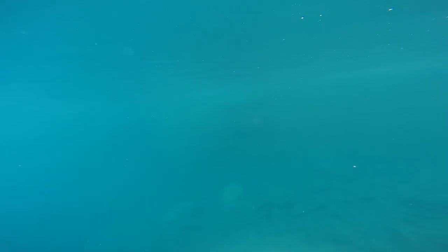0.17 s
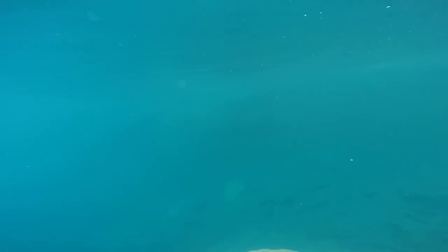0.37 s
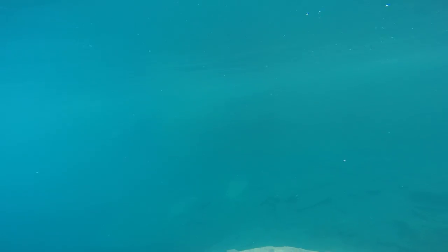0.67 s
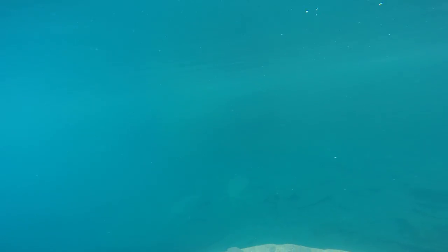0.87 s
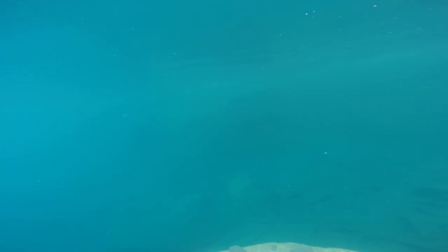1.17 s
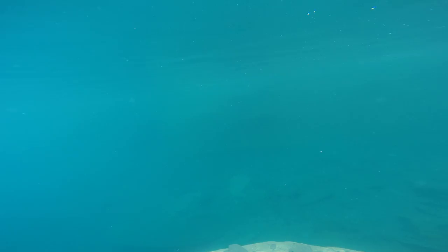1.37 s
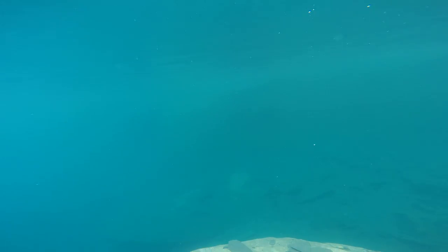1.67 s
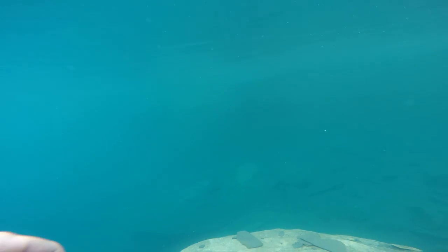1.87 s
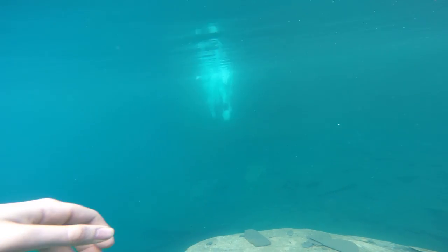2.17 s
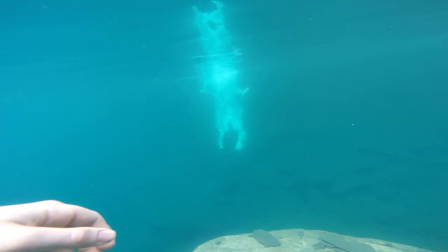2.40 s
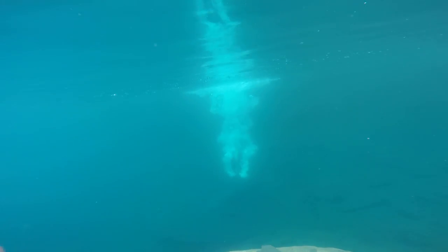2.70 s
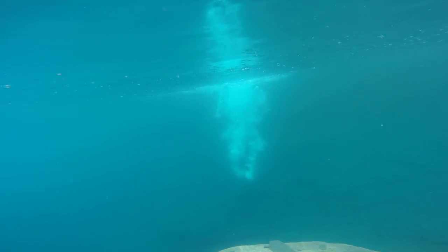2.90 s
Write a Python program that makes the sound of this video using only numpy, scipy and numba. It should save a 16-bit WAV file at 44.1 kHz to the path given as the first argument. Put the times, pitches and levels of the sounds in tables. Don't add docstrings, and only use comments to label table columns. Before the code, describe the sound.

A diver plunges in some metres off, heard underwater: soft low knocks and dark sloshing come first, then a bright slap, a tiny hush and fizzing bubbles, through a microphone sealed in a hard resonant housing.

```python
import sys
import numpy as np
from scipy import signal
from scipy.fft import rfft, irfft
from scipy.io import wavfile
from scipy.ndimage import uniform_filter1d
from numba import njit

SR = 44100
rng = np.random.default_rng(int(sys.argv[2]) if len(sys.argv) > 2 else 0)


def master_out(mix):
    frames = np.transpose(np.atleast_2d(mix))
    ceiling = np.clip(frames, -1, 1)
    pcm = np.round(ceiling * 32767).astype(np.int16)
    wavfile.write(sys.argv[1], SR, pcm)


def how_loud(loudness_db):
    steps = np.asarray(loudness_db, float) / 20
    return 10 ** steps


N = 134505


def level(x, db):
    return x * how_loud(db) / np.sqrt(np.mean(x ** 2))


def band(x, hz, width_hz):
    return signal.lfilter(*signal.iirpeak(hz, hz / width_hz, fs=SR), x)


def coloured(colour):
    hz = np.maximum(np.fft.rfftfreq(N, 1 / SR), 1)
    points_hz, points_db = np.array(colour).T
    gain = how_loud(np.interp(np.log(hz), np.log(points_hz), points_db)) * (hz > 12)
    return level(irfft(rfft(rng.standard_normal(N)) * gain, N), 0)


def walk(rate_hz):
    hold = int(SR / rate_hz)
    steps = np.repeat(rng.standard_normal(N // hold + 1), hold)
    return 1.64 * uniform_filter1d(uniform_filter1d(steps, hold), hold)[:N]


def ring(since_s, hz, t60_s):
    since_s = np.maximum(since_s, 0)
    return np.exp(-np.log(1000) * since_s / t60_s) * np.sin(2 * np.pi * hz * since_s)


@njit
def grains(at, hz, cycles, glide, size, count):
    out = np.zeros(count)
    for k in range(len(at)):
        length = int(2.5 * cycles * SR / hz[k])
        for i in range(min(length, count - at[k])):
            c = i * hz[k] / SR
            phase = 2 * np.pi * c * (1 + glide * c / cycles / 2)
            out[at[k] + i] += size[k] * np.exp(-2 * c / cycles) * np.sin(phase)
    return out


def scatter(count):
    when, pitch, size = rng.random((count, 3)).T
    return (when * N).astype(np.int64), pitch, size


# pitch_hz [Hz], level_db [dB per Hz]
HISS_COLOUR = [(300, -12), (550, -3), (1000, -5), (3000, -12), (6000, -18.5), (9000, -24.5), (12500, -28),
               (15300, -35)]
# pitch_hz [Hz], level_db [dB]
CIRCUIT_WHINES = [(5846, -82), (5873, -91), (11687, -97), (11719, -88), (14626, -84), (14653, -97)]


def electronics(t):
    hiss = level(coloured([(150, -33)] + list(HISS_COLOUR)), -62.5)
    for hz, db in CIRCUIT_WHINES:
        hiss += how_loud(db) * np.sqrt(2) * np.sin(2 * np.pi * hz * t)
    return hiss


# start_s [s], level_db [dB]
SLOSH_LEVEL = [(0, -47), (.3, -47), (.75, -53.5), (1.1, -56.5), (1.3, -55), (1.5, -52), (1.95, -52.5),
               (2.1, -52.5), (2.35, -49.5), (2.55, -53), (2.75, -47.5), (3.05, -42)]
# pitch_hz [Hz], level_db [dB per Hz]
WASH_COLOUR = [(20, 2), (55, -2), (100, -6), (160, -12), (280, -17), (420, -19), (700, -31.5), (1200, -54)]


def slosh(t):
    db = np.interp(t, *np.array(SLOSH_LEVEL).T) + 2.42 * walk(8.42)
    return coloured(WASH_COLOUR) * how_loud(db)


def surge():
    hz, width_hz = 33.4, 25
    return level(band(band(rng.standard_normal(N), hz, width_hz), hz, width_hz), -57)


def gurgle(t):
    start_s, rise_s, lowest_hz = 2.77, 0.04, 110
    at, pitch, size = scatter(5000)
    size = how_loud(-3 * np.log(1 - size) - 6 * pitch)
    bubbles = grains(at, lowest_hz * 5.5 ** pitch, 2.5, 0.2, size, N)
    fade_in = 1 / (1 + np.exp(-(t - start_s) / rise_s))
    return fade_in * level(band(bubbles, 300, 800), -50.5)


# start_s [s], level_db [dB], length_ms [ms]
CRACKLES = [(.623, -70, 6.5), (.630, -72, 3.), (.637, -70, 2.), (.652, -72, 4.), (.672, -68, 3.6),
            (.693, -66, 3.), (.730, -74, 4.), (1.105, -71, 3.), (1.239, -73, 3.), (1.522, -69, 3.),
            (1.674, -70, 3.), (1.907, -72, 6.8)]


def ticks(t):
    hz, width_hz = 10130, 900
    env = sum(how_loud(db) * np.exp(-((t - s) * 2000 / ms) ** 2) for s, db, ms in CRACKLES)
    noise = band(band(rng.standard_normal(N), hz, width_hz), hz, width_hz)
    return env * level(noise, 0)


# trough_s [s], level_db [dB], pitch_hz [Hz], rise_s [s], fall_s [s]
KNOCK_SWELLS = [(-.002, -37.5, 75.6, .004, 0.026), (0.14, -29.5, 64.6, 0.011, 0.027),
                (.421, -57, 40.4, .02, 0.022), (.568, -37, 61.6, 0.032, 0.041),
                (.540, -37.5, 83, 0.023, 0.013), (.686, -42.5, 45.4, 0.018, 0.034),
                (0.806, -31, 63.5, .018, 0.032), (1.039, -48, 70, 0.011, 0.014),
                (1.179, -37, 71, 0.029, 0.013), (1.221, -39.5, 42, 0.014, 0.021),
                (1.441, -31, 54.5, 0.011, 0.031), (1.661, -42.5, 45.3, 0.0067, 0.014),
                (1.794, -29.5, 67, 0.018, 0.028), (1.856, -36.5, 36, 0.0085, 0.033),
                (2.082, -30, 55.6, 0.023, 0.016), (2.195, -36, 56.4, 0.014, 0.024),
                (2.453, -30, 64.3, 0.015, 0.02), (2.429, -36.5, 86, 0.01, 0.0095),
                (2.646, -35, 30.6, 0.032, 0.011), (2.715, -33, 57.3, 0.0062, 0.053),
                (2.79, -38, 77, 0.013, 0.011), (2.936, -37, 57.6, 0.013, 0.016),
                (2.869, -42, 95, 0.028, .02)]
# start_s [s], level_db [dB], width_ms [ms], polarity [sign]
KNOCK_SNAPS = [
    (.124, -26, 2.2, -1),
    (.530, -48, 2.2, -1),
    (.790, -29, 2.05, -1),
    (1.424, -26.5, 2.39, -1),
    (1.773, -36.5, 1.13, 1),
    (2.062, -29.5, 2, -1),
    (2.699, -25.5, 2.23, -1),
    (2.909, -33.5, 1.6, -1),
    (1.169, -42, 2., -1),
]
# pitch_hz [Hz], level_db [dB per Hz]
STIRRED_COLOUR = [(40, 2.5), (90, 3.5), (170, -3.5), (300, -13), (450, -14.5), (800, -33.5), (1500, -49.5)]


def knocks(t):
    sag_per_s = 5.1
    rumble_db, rumble_tail = -16, 1.82
    edge_hz, edge_db, edge_t60_s, edge_lead_s = 358, -12.5, 0.022, 0.00308
    out, stir = np.zeros(N), np.zeros(N)
    for trough_s, db, hz, rise_s, fall_s in KNOCK_SWELLS:
        u = t - trough_s
        env = np.exp(-(u / np.where(u < 0, rise_s, fall_s)) ** 2)
        out -= how_loud(db) * env * np.cos(2 * np.pi * hz * u * (1 - sag_per_s * u / 2))
        stir += how_loud(db) * np.exp(-np.abs(u) / np.where(u < 0, rise_s, fall_s * rumble_tail))
    for start_s, db, width_ms, polarity in KNOCK_SNAPS:
        u = (t - start_s) * 1000 / width_ms
        notch = (1 - u ** 2) * np.exp(-u ** 2 / 2)
        edge = how_loud(edge_db) * ring(t - start_s + edge_lead_s, edge_hz, edge_t60_s)
        out += np.sign(polarity) * how_loud(db) * (notch + edge)
    return out + how_loud(rumble_db) * stir * coloured(STIRRED_COLOUR)


# pitch_hz [Hz], width_hz [Hz], level_db
# [dB]
SHELL_MODES = [(1193, 70, -16.5), (1582, 113, 0), (1815, 290, -3.5), (2197, 85, -1.5), (2430, 330, -3.5),
               (2920, 310, -9), (3520, 120, -13), (4120, 920, -9), (9100, 540, -20.5), (11500, 2000, -36),
               (12900, 1900, -17.5),
               (6450, 450, -10.5), (7550, 560, -11.5)]


def housing(x, tilt_db, flicker_db):
    out = np.zeros(N)
    for hz, width_hz, db in SHELL_MODES:
        octaves = np.log2(min(hz, 8000) / 2000)
        gain = how_loud(db + tilt_db * octaves + flicker_db * walk(8.1))
        out += gain * band(x, hz, width_hz) / np.sqrt(width_hz / 150)
    return out


# start_s [s], pitch_hz [Hz], length [cycles], level_db [dB]
LONE_BUBBLES = [
    (2.614, 9200, 40, -53),
    (2.885, 2250, 25, -52),
    (3.008, 1130, 20, -51),
    (3.028, 6400, 40, -55),
]


def lone_bubbles():
    out = np.zeros(N)
    for start_s, hz, cycles, db in LONE_BUBBLES:
        at, size = np.array([int(start_s * SR)]), np.array([how_loud(db) * 1.4])
        out += grains(at, np.array([float(hz)]), float(cycles), 0.03, size, N)
    return out


# start_s [s], level_db [dB], tilt_db [dB per octave]
BUBBLE_CLOUD = [
    (2.149, -71.5, 9),
    (2.18, -59, 6.5),
    (2.31, -56, 7),
    (2.4, -55.5, 6),
    (2.53, -54.5, 1.5),
    (2.66, -58.5, 4),
    (2.7, -54, -4),
    (2.9, -57.5, 1.5),
    (3.05, -55.5, 1.5),
]


def fizz(t):
    bubbles_per_s, blips_per_s = 30000, 1200
    at, pitch, size = scatter(int(bubbles_per_s * N / SR))
    hz = 900 * 17 ** pitch
    size = how_loud(np.minimum(-2.2 * np.log(1 - size), 12)) * hz / 2000
    cloud = level(grains(at, hz, 3.9, 0.18, size, N), 0)
    at, pitch, size = scatter(int(blips_per_s * N / SR))
    blips = grains(at, 1200 * 2.6 ** pitch, 10.0, 0.06, how_loud(-3 * np.log(1 - size)), N)
    start_s, level_db, tilt_db = np.array(BUBBLE_CLOUD).T
    gain = 4 * how_loud(np.interp(t, start_s, level_db, left=-120))
    return gain * housing(cloud + level(blips, -9), np.interp(t, start_s, tilt_db), 1.4)


# start_s [s], level_db [dB], rise_ms [ms], t60_s [s], tilt_db [dB per octave]
SLAP_HITS = [
    (2.102, -51, 1.4, 0.036, 3),
    (2.1033, -48.5, 0.54, 0.12, 2.5),
    (2.1077, -37.5, 3.5, 0.029, 5.5),
    (2.113, -40.5, 1.1, 0.053, 1),
]
# pitch_hz [Hz], level_db [dB], t60_s [s]
STRUCK_TONES = [(2580, -28, .035), (2250, -31, .04), (1530, -32, .04), (1000, -46, .04), (410, -41, .05),
                (135, -35, .12)]


def slap(t):
    strike_s = 2.1094
    out = np.zeros(N)
    for start_s, db, rise_ms, t60_s, tilt_db in SLAP_HITS:
        u = t - start_s
        env = np.exp(np.where(u < 0, -(u * 1000 / rise_ms) ** 2, -np.log(1000) * u / t60_s))
        out += how_loud(db) * 5 * housing(env * rng.standard_normal(N), tilt_db, 0)
    for hz, db, t60_s in STRUCK_TONES:
        out -= how_loud(db) * ring(t - strike_s, hz, t60_s)
    return out


def scene():
    t = np.arange(N) / SR
    background = electronics(t) + slosh(t) + surge() + gurgle(t) + ticks(t)
    return (background + knocks(t) + lone_bubbles() + fizz(t) + slap(t))[None]


def low_pass(x):
    return signal.sosfilt(signal.butter(12, 15650, fs=SR, output="sos"), x)


def record(dry):
    lowpass = signal.ellip(12, 0.5, 60, 15260, fs=SR, output="sos")
    return low_pass(signal.sosfilt(lowpass, dry))


dry = scene()
out = record(dry)
master_out(out)
```